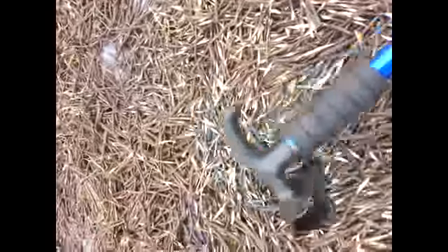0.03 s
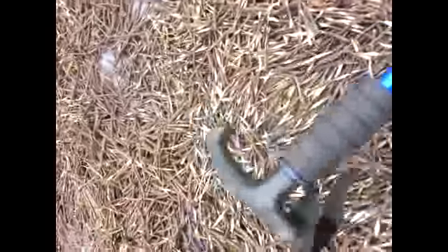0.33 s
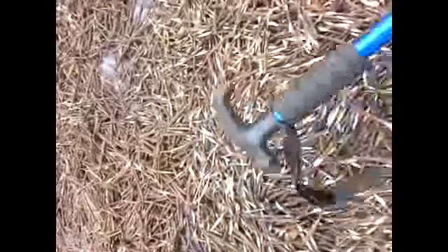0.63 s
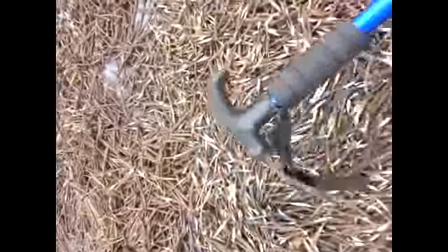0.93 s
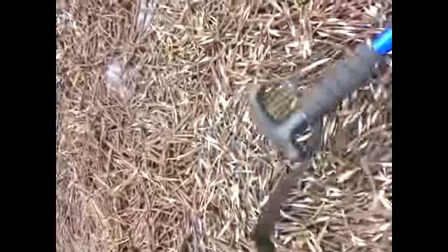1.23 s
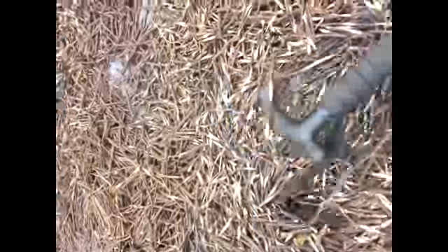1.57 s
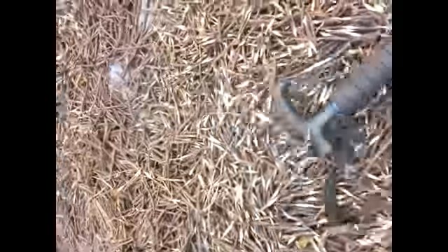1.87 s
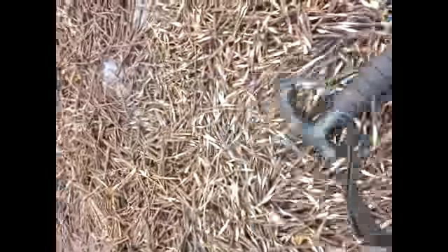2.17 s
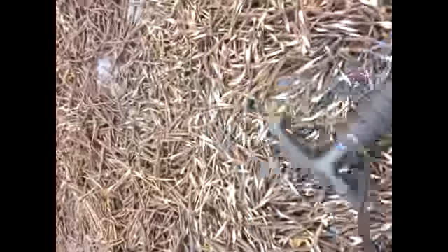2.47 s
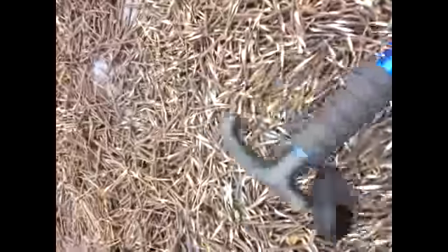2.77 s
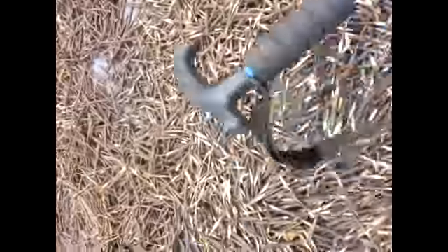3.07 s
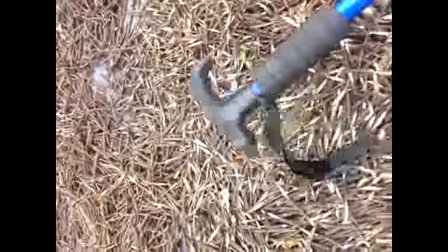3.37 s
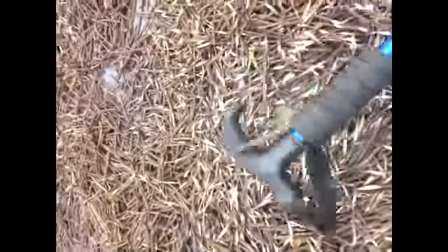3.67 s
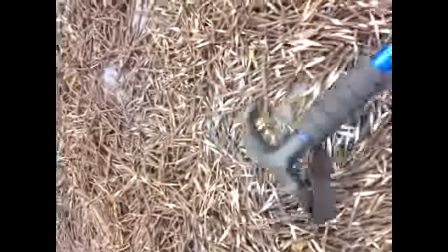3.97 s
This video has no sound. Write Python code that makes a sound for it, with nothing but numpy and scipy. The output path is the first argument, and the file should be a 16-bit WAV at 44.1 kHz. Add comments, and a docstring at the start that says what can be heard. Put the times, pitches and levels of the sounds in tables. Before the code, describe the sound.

Close, steady whacks crunch into a heap of dry pods and stalks, with rustling between.

```python
"""A hand tool beats a heap of dry bean pods and stalks on the ground, three blows a second, close up.
Each blow brushes the top stalks, crushes the pods in a burst of tiny cracks and may thud on the soil.
The heap rustles as it springs back and as the tool drags free.
Single stalks snap and tick over quiet outdoor air."""
import sys
import numpy as np
from scipy import signal
from scipy.fft import rfft, irfft
from scipy.io import wavfile

SR = 44100
rng = np.random.default_rng(int(sys.argv[2]) if len(sys.argv) > 2 else 0)


def output_pcm(signal):
    """Save a mono or channel-first signal as 16-bit PCM at the path in sys.argv[1].

    Samples are clipped to [-1, 1] before scaling.
    """
    pcm = np.clip(np.atleast_2d(signal).T, -1, 1) * 32767
    wavfile.write(sys.argv[1], SR, np.round(pcm).astype(np.int16))


N = 176400
T = np.arange(N) / SR

# Tone of the bright crush, hollow pods and dull knock. Each row: frequency in Hz, relative level in dB.
CRUSH_EQ = [(100, -43), (300, -33), (600, -26.5), (1000, -10.5), (2000, -4.5), (2700, -5), (4300, -0.5),
            (6000, -7), (7700, -5), (10000, -8), (14500, -10)]
POD_EQ = [(150, -51), (400, -9.5), (800, -13), (1200, -4), (1600, 0.5), (2100, 2.5), (2800, -10.5),
          (6000, -15)]
KNOCK_EQ = [(100, -33), (300, -22), (450, -2.5), (1100, 2), (1600, -11), (4000, -34)]
# The beating. Each row: start in seconds, crush level in dB, crush hold in seconds, pod level in dB,
# pod pitch in Hz, knock level in dB, knock pitch in Hz, lead of the first touch in seconds,
# touch level in dB, settling rustle level in dB.
BLOWS = [(0.2078, -7.5, 0.0052, -12, 1620, -27, 576, 0.014, -28, -30.5),
         (0.5413, -9, .006, -14, 1500, -27, 580, .021, -22.5, -32),
         (0.8696, -8.5, 0.0072, -20.5, 1260, -25.5, 980, 0.013, -17, -34),
         (1.228, -8, 0.01, -15, 1810, -26.5, 720, 0.0094, -15, -30.5),
         (1.5753, -11, 0.01, -20.5, 1420, -34.5, 735, 0.0062, -29, -30),
         (1.924, -7, 0.0033, -17, 1690, -24, 510, 0.0051, -13, -34.5),
         (2.2842, -8.5, 0.0039, -14, 1590, -28.5, 530, 0.0024, -9, -33.5),
         (2.6361, -6.5, 0.011, -13, 1650, -27, 740, 0.0145, -25.5, -31),
         (2.9769, -5, 0.0067, -9, 1590, -23, 617, .025, -29, -31.5),
         (3.3145, -8.5, 0.0082, -16, 1800, -30, 600, 0.008, -14, -34),
         (3.6616, -13.5, 0.015, -23, 1490, -32.5, 620, 0.0089, -20, -32.5),
         (3.9883, -7.5, 0.0037, -13, 1770, -17.5, 600, 0.014, -26, -20)]
def blows():
    """The tool touches the top stalks, crushes the hollow pods and leaves them splintering."""
    crack_power, body = np.zeros(N), np.zeros((2, N))
    pods = colour(stereo_noise(), POD_EQ)
    heap = colour(stereo_noise(), KNOCK_EQ)
    for start, crush_db, hold, pod_db, pod_hz, knock_db, knock_hz, lead, touch_db, _ in BLOWS:
        t = T - start
        touch = amp(touch_db) * press(t + lead, lead, rise_s=0.002, fall_s=0.0057)
        crush = amp(crush_db) * press(t, hold, rise_s=0.0018, fall_s=0.0057)
        splinter = amp(crush_db) * fade(t - hold, 0.011)
        crack_power += touch ** 2 + crush ** 2 + splinter ** 2
        hollow = amp(pod_db) * (pods + amp(-7.5) * ring(pods, pod_hz, width_hz=120)) / np.sqrt(2)
        knock = amp(knock_db) * ring(heap, knock_hz, width_hz=155)
        body += press(t, hold, rise_s=0.0019, fall_s=0.0073) * (hollow + knock)
    return body + np.sqrt(crack_power) * crackle(CRUSH_EQ, per_s=9000, spread_db=2)


def crackle(eq, per_s, spread_db, stalks=40, size=256):
    """A steady stream of tiny cracks, each from one of many stalks with its own pitch."""
    t, out = (np.arange(size) - size // 8) / SR, np.zeros((2, N))
    hit = rng.random(N) < per_s / SR
    strength = hit * amp(spread_db * np.minimum(rng.exponential(1, N), 4)) * rng.choice([-1, 1], N)
    stalk = rng.integers(0, stalks, N)
    for k, hz in enumerate(np.linspace(1200, 14000, stalks)):
        burst = rng.standard_normal((2, size)) * fade(t, 0.0013)
        grain = unit(ports(unit(burst) + 1.1 * ring(burst, hz, width_hz=1350)))
        out += signal.oaconvolve((strength * (stalk == k))[None], grain, axes=1)[:, :N]
    return colour(out, eq)


# Weight under the blows that reach the soil. Each row: start in seconds, relative level in dB,
# pitch in Hz, decay in seconds, relative level of the deep thump in dB.
THUDS = [(0.2138, -32.5, 172.5, 0.0092, -60), (0.5368, -30, 248, 0.0084, -60),
         (1.234, -31, 257, 0.0071, -31.5), (1.9224, -34.5, 365, 0.007, -67), (2.639, -32, 169, 0.0036, -42),
         (2.9782, -15.5, 189, 0.0029, -32.5), (3.986, -17, 223, 0.0027, -42)]
def thuds(thump_hz=84):
    """The soil answers a hard blow with a few low cycles over a deep thump."""
    out = np.zeros(N)
    for start, db, hz, decay_s, thump_db in THUDS:
        t = np.maximum(T - start, 0)
        attack = 1 - fade(t, 0.0028)
        tone = amp(db) * fade(t, decay_s) * np.sin(2 * np.pi * hz * t)
        thump = amp(thump_db) * fade(t, 0.0087) * np.sin(2 * np.pi * thump_hz * t)
        out += 2 * attack * (tone + thump)
    return out * amp([[-1], [1]])  # a touch to the right


# Tone of the rustle's bright and dull layers. Each row: frequency in Hz, relative level in dB.
BRIGHT_EQ = [(100, -45), (500, -17.5), (1500, -4), (2700, -6), (4400, -2.5), (6000, -6.5), (8000, -4),
             (11000, -8.5), (14500, -7.5)]
DULL_EQ = [(100, -14), (300, -1.5), (1000, -5), (1800, 2), (2700, -2), (4400, 1), (7000, -7.5), (14000, -7)]
def rustle():
    """The straw crackles as it shifts; stray clicks swell with the movement and stay faint at rest."""
    bright_power, dull_power = settling()
    bright_power += drags()
    clicks = (np.sqrt(bright_power) + amp(-59)) * stray_clicks()
    bright = np.sqrt(bright_power + crunches())
    flutter = bunching()
    bright_cracks = crackle(BRIGHT_EQ, per_s=7000, spread_db=3)
    dull_cracks = crackle(DULL_EQ, per_s=7000, spread_db=3)
    return clicks + flutter * (bright * bright_cracks + np.sqrt(dull_power) * dull_cracks)


def settling(bright_db_per_s=63.5, dull_db_per_s=113):
    """The heap springs back after each blow: power envelopes of a bright tail and a shorter dull one."""
    bright, dull = np.zeros(N), np.zeros(N)
    for start, *_, db in BLOWS:
        t = np.maximum(T - start, 0)
        attack = 1 - fade(t, 0.005)
        still_moving = 1 / (1 + (t / 0.23) ** 8)
        bright += (attack * still_moving * amp(db - bright_db_per_s * t)) ** 2
        dull += (attack * amp(db + 6 - dull_db_per_s * t)) ** 2
    return bright, dull


# Swishes between blows. Each row: centre in seconds, level in dB, half length in seconds.
DRAGS = [(-0.006, -35.5, 0.043), (0.086, -39.5, 0.011), (0.404, -36, 0.019), (0.607, -48, .015),
         (0.756, -38.5, 0.032), (0.845, -38, 0.022), (0.962, -38.5, 0.053), (1.2, -40.5, 0.018),
         (1.415, -52, 0.017), (1.805, -35, .022), (2.049, -37, 0.019), (2.125, -38, 0.023),
         (2.217, -42.5, 0.021), (2.395, -36.5, 0.014), (2.775, -40, 0.012), (3.06, -36, 0.015),
         (3.485, -39, 0.031), (3.588, -38.5, 0.042), (3.74, -60, 0.023), (3.858, -37.5, 0.037),
         (3.947, -31, 0.014)]
def drags():
    """The tool drags through the straw: bell-shaped swells of rustle power."""
    return sum(amp(db) ** 2 * fade((T - centre) ** 2, half ** 2) for centre, db, half in DRAGS)


# Short crunchy accents. Each row: start in seconds, level in dB, decay in seconds.
CRUNCHES = [(0.1404, -29.5, 0.012), (1.0814, -32.5, 0.0029), (1.45, -37, .003), (1.5378, -35, 0.0012),
            (1.599, -17.5, 0.0094), (2.133, -39, 0.0037), (2.1622, -32, 0.0085), (2.217, -38, 0.0085),
            (2.4575, -32.5, .004), (2.4853, -36.5, 0.004), (2.6206, -19, 0.0012), (2.842, -44, .004),
            (3.1532, -24, 0.026), (3.5616, -33.5, 0.0065)]
def crunches():
    """Small clumps of pods give way: sharp spikes of rustle power."""
    return sum((amp(db) * press(T - start, 0.0023, rise_s=0.00083, fall_s=decay_s)) ** 2
               for start, db, decay_s in CRUNCHES)


def bunching(step_s=0.0063, depth_db=1.06):
    """Stalks slip in bunches: a gain that wanders quickly."""
    knots = np.arange(0, N / SR + 0.1, step_s)
    wander = rng.standard_normal(2000)[:len(knots)]
    return amp(depth_db * np.interp(T, knots, wander))


def stray_clicks(count=180, size=512):
    """Separate stalks click as they slip, each with its own pitch and strength."""
    out = np.zeros((2, N + size))
    envelope = fade(np.arange(size) / SR, 0.001)
    for place, pitch, softness in rng.random((count, 3)):
        noise = unit(stereo_noise(size))
        click = (ring(noise, 2000 + 10000 * pitch, width_hz=1500) + 0.6 * noise) * envelope
        at = int(place * N)
        out[:, at:at + size] += amp(10 - 14 * softness) * click
    return out[:, :N]


# Crisp highlights. Each row: start in seconds, level in dB, pitch in Hz.
SNAPS = [(0.0826, -25.5, 12600), (0.338, -25.5, 7160), (0.4613, -32.5, 4200), (0.5224, -32, 6000),
         (1.7993, -18, 9450), (2.115, -27, 11000), (2.3912, -26, 10900), (2.6055, -42, 7000),
         (2.958, -24, 7040), (3.7708, -18.5, 4000), (3.7819, -9, 4530), (3.7819, -16.5, 6800),
         (3.8052, -24, 4260)]
def snaps():
    """Single dry stalks break with a short, high crack."""
    return sum(stem(start, db, hz, width_hz=1100, decay_s=0.0022, crack_db=-7) for start, db, hz in SNAPS)


# Soft, woody detail. Each row: start in seconds, level in dB.
TICKS = [(.052, -37.5), (0.4926, -36.5), (1.13, -43), (1.3795, -29), (1.537, -38), (1.842, -35),
         (2.2158, -37), (2.5673, -37), (2.9237, -34), (3.2781, -31.5)]
def ticks():
    """Knocked pods and stems give a hollow tick."""
    return sum(stem(start, db, hz=2000, width_hz=400, decay_s=0.0059, crack_db=-5) for start, db in TICKS)


def stem(start, db, hz, width_hz, decay_s, crack_db, size=2048):
    """One stem breaks or is knocked: a short burst with a resonance and little sound below it."""
    noise = unit(stereo_noise(size))
    envelope = amp(db) * fade(np.arange(size) / SR, decay_s)
    burst = envelope * (ring(noise, hz, width_hz) + amp(crack_db) * noise)
    low_cut = signal.butter(3, min(0.7 * hz, 5000), "high", fs=SR, output="sos")
    return np.pad(signal.sosfilt(low_cut, burst), ((0, 0), (round(start * SR), N)))[:, :N]


# Tone of the background bed. Each row: frequency in Hz, relative level in dB.
AIR_EQ = [(25, -1), (70, -14.5), (150, -0.5), (240, -2), (400, -5.5), (800, -5), (1800, -10), (3000, -9.5),
          (5000, -11.5), (14000, -19.5)]
def air():
    """Quiet, steady outdoor air."""
    return amp(-49) * colour(stereo_noise(), AIR_EQ)


# Stereo width. Each row: frequency in Hz, likeness of left and right (held to 0..1 when played).
LIKENESS = [(50, 1.14), (300, 0.19), (1600, 1.33), (2500, 0), (4000, 0.29), (14000, -1.71)]
# Stereo balance. Each row: frequency in Hz, left minus right in dB.
BALANCE = [(300, -2), (1200, 1.5), (2000, 0), (4500, -.5), (8000, 1.7), (12000, 4.5), (14500, 3)]
def ports(pair, lag_s=0.000125):
    """Two unrelated signals as two microphone ports hear them: alike in the mids, left a little early."""
    size = pair.shape[-1]
    hz = np.fft.rfftfreq(size, 1 / SR)
    left, other = rfft(pair)
    likeness = np.clip(read(LIKENESS, hz), 0, 1)
    lean = amp(read(BALANCE, hz) / 2)
    right = (likeness * left + np.sqrt(1 - likeness ** 2) * other) * np.exp(-2j * np.pi * hz * lag_s)
    return irfft(np.array([left * lean, right / lean]), size)


def stereo_noise(size=N):
    """White noise through the two ports."""
    return ports(rng.standard_normal((2, size)))


def colour(x, eq, size=8192):
    """Minimum-phase EQ; the result has rms 1."""
    log_gain = np.log(amp(read(eq, abs(np.fft.fftfreq(size, 1 / SR)))))
    response = np.exp(np.conj(signal.hilbert(log_gain)))
    taps = np.fft.ifft(response).real[:size // 2]
    return unit(signal.oaconvolve(x, taps[None], axes=1)[:, :N])


def ring(x, hz, width_hz):
    """One resonance; the result has rms 1."""
    r = np.exp(-np.pi * width_hz / SR)
    return unit(signal.lfilter([1, 0, -1], [1, -2 * r * np.cos(2 * np.pi * hz / SR), r * r], x))


def press(since, hold_s, rise_s, fall_s):
    """Force on the heap: builds up to time zero, holds while the heap gives, and falls."""
    rise = np.minimum(since, 0) / rise_s
    fall = np.maximum(since - hold_s, 0) / fall_s
    return np.exp(np.maximum(rise - fall, -40))


def fade(since, decay_s):
    """Silent until time zero, then dying away."""
    return (since >= 0) * np.exp(-np.clip(since / decay_s, 0, 40))


def read(curve, hz):
    """Reads a curve on a log-frequency axis."""
    knots_hz, values = np.transpose(curve)
    return np.interp(np.log(hz + 1), np.log(knots_hz), values)


def amp(db):
    """Decibels to gain."""
    return 10 ** (np.asarray(db) / 20)


def unit(x):
    """Scales to rms 1."""
    return x / np.sqrt(np.mean(x ** 2) + 1e-20)


def scene():
    """All sources at the microphone."""
    return air() + blows() + thuds() + rustle() + snaps() + ticks()


def record(dry, low_cut_hz=75, gain_db=1, threshold_db=-13.5, release_db_per_s=83, high_cut_hz=14650):
    """Low cut; a gentle limiter ducks after loud blows but lets the hardest cracks clip; high cut."""
    x = amp(gain_db) * signal.sosfilt(signal.butter(2, low_cut_hz, "high", fs=SR, output="sos"), dry)
    power_db = 10 * np.log10(signal.lfilter([0.004], [1, -0.996], (x ** 2).mean(0)) + 1e-12)
    fall_db = T * release_db_per_s
    detector_db = np.maximum.accumulate(power_db + fall_db) - fall_db  # catches peaks, then releases
    duck_db = 0.24 * np.maximum(detector_db - threshold_db, 0)
    clipped = np.clip(x * amp(-duck_db), -0.99, 0.99)
    high_cut = signal.firwin(301, high_cut_hz, window=("kaiser", 8), fs=SR)
    return signal.oaconvolve(clipped, high_cut[None], "same", axes=1)


dry = scene()
out = record(dry)
output_pcm(out)
```